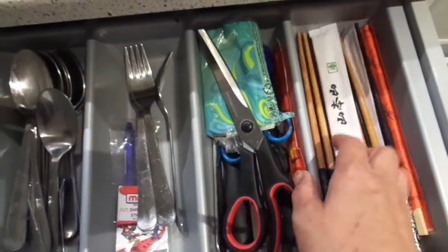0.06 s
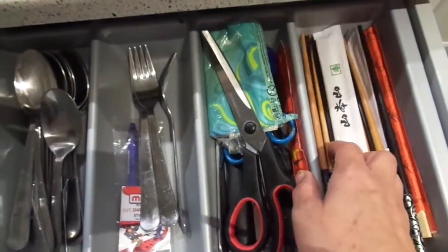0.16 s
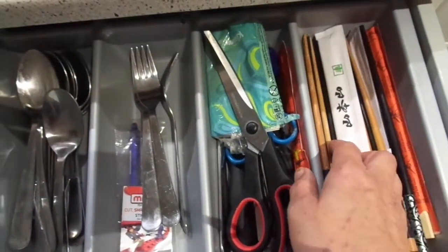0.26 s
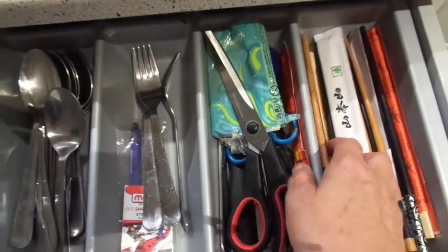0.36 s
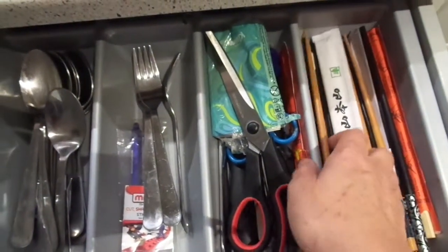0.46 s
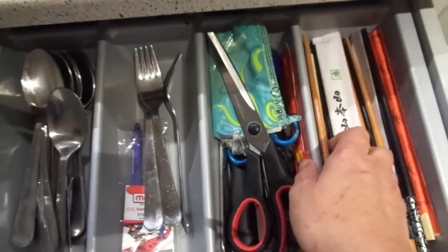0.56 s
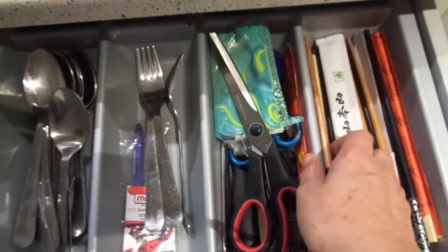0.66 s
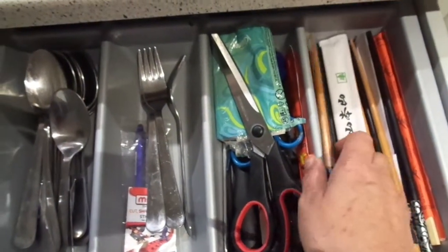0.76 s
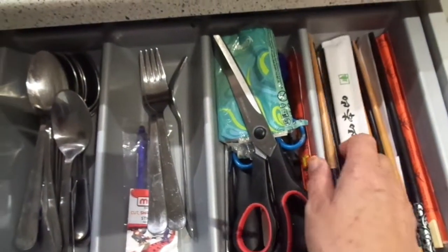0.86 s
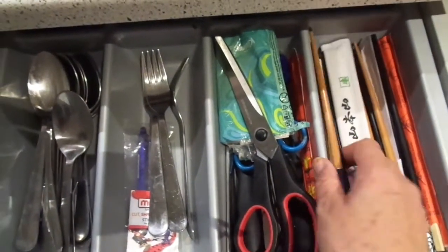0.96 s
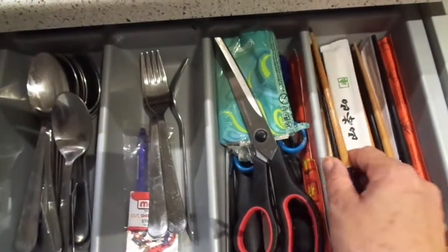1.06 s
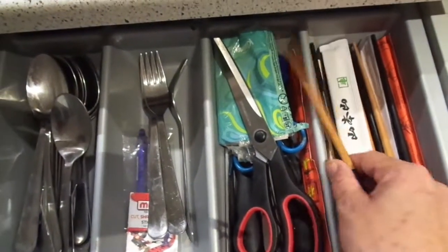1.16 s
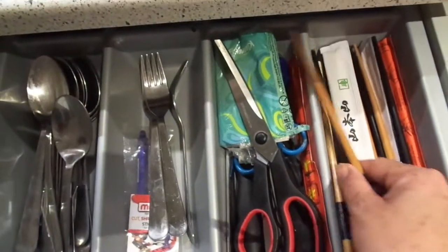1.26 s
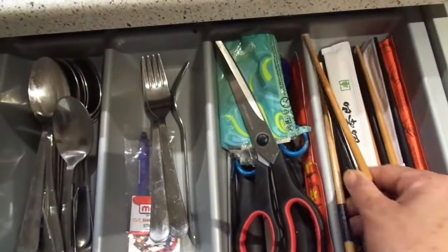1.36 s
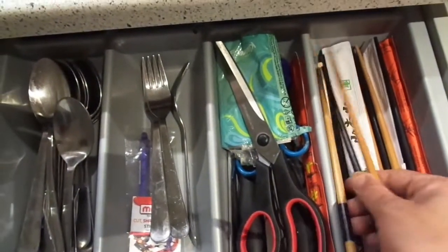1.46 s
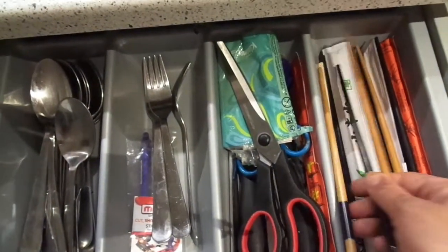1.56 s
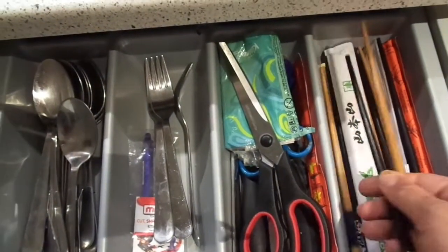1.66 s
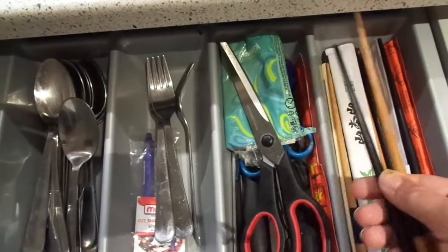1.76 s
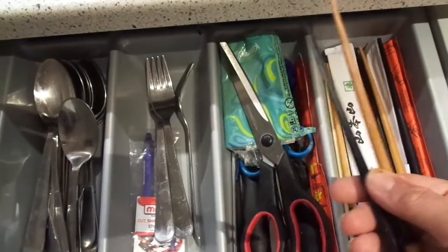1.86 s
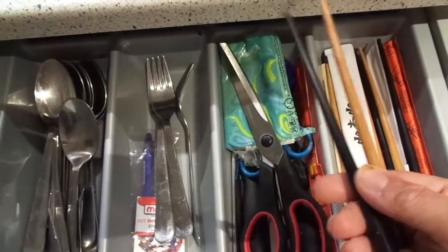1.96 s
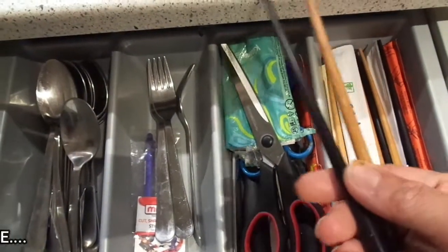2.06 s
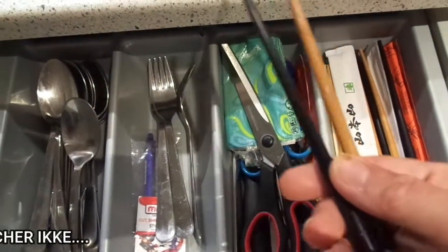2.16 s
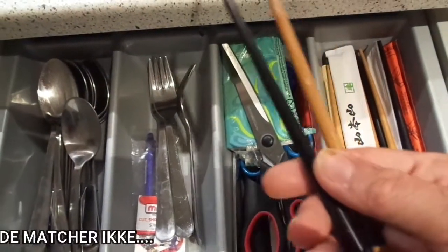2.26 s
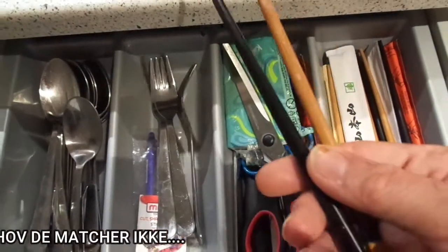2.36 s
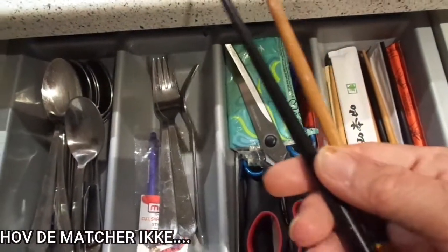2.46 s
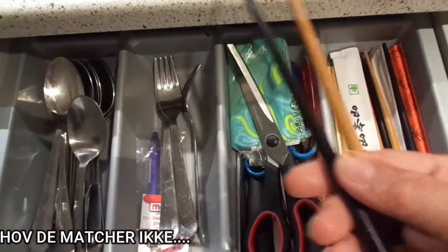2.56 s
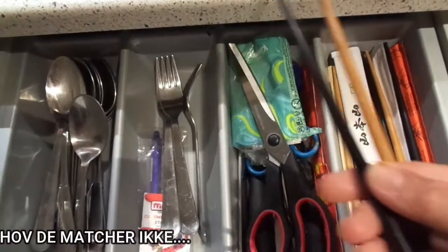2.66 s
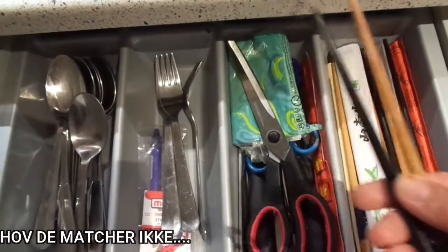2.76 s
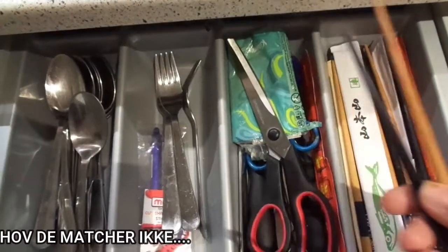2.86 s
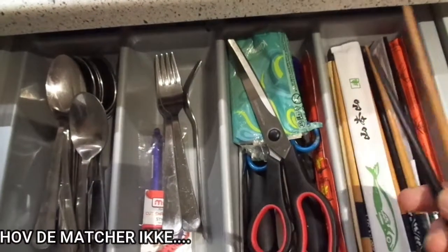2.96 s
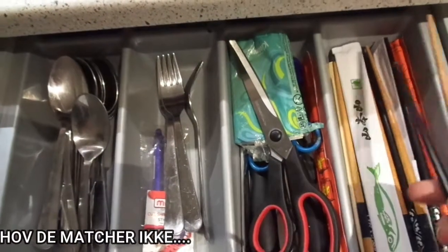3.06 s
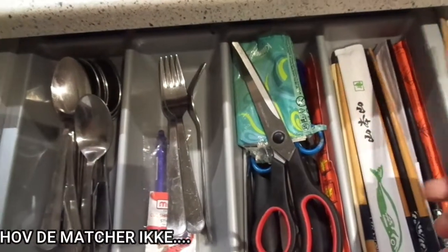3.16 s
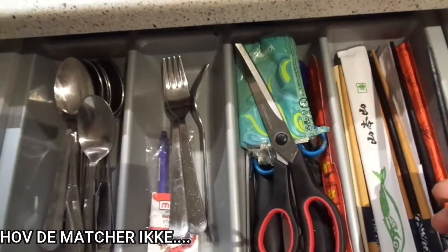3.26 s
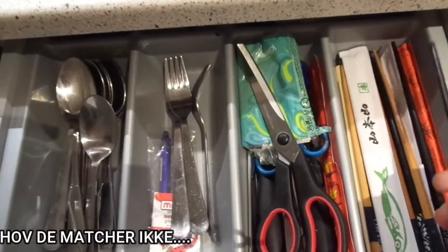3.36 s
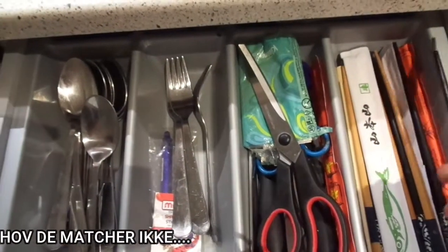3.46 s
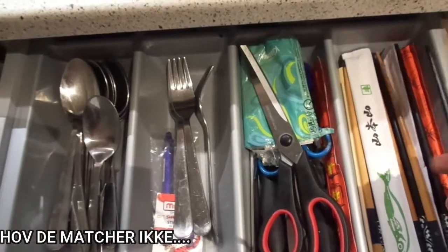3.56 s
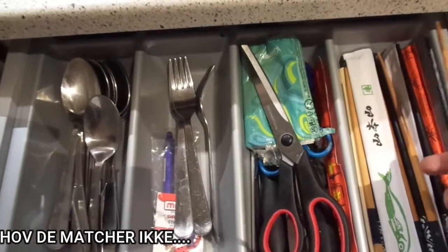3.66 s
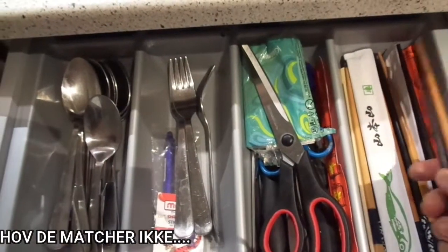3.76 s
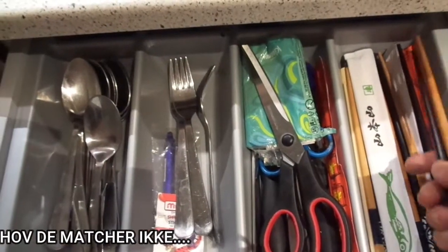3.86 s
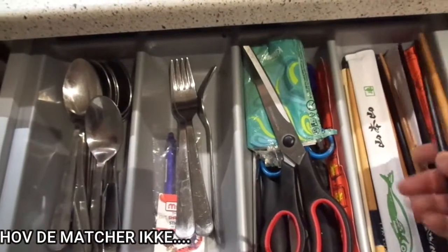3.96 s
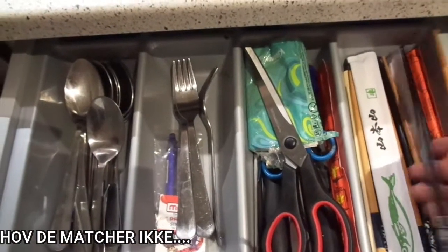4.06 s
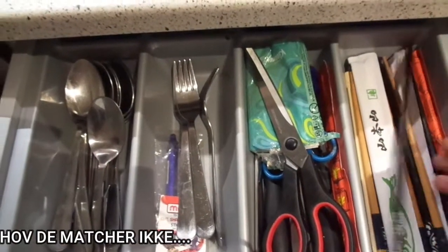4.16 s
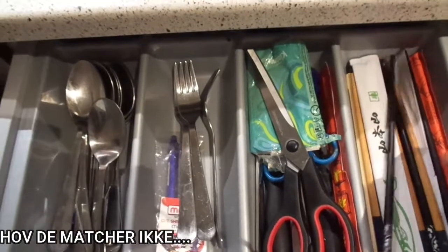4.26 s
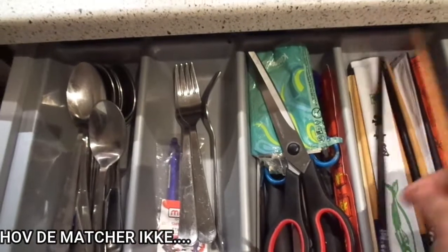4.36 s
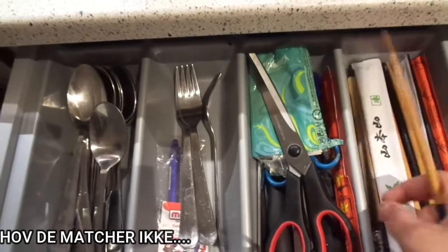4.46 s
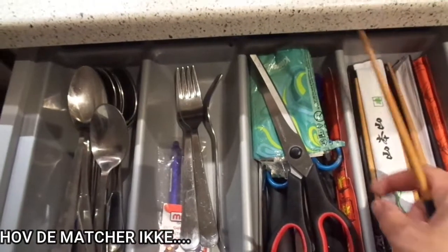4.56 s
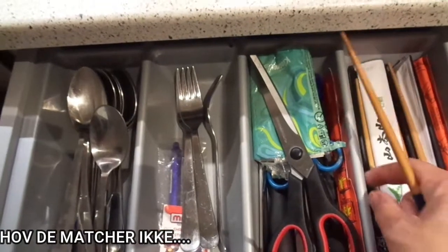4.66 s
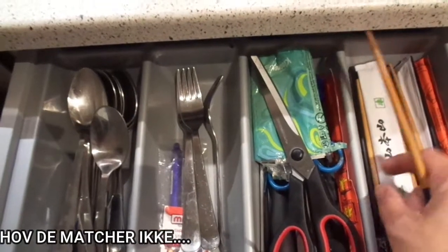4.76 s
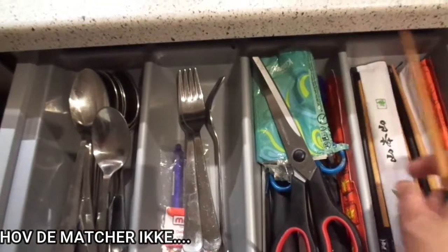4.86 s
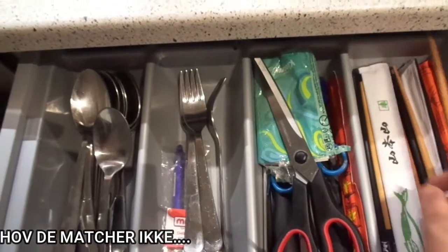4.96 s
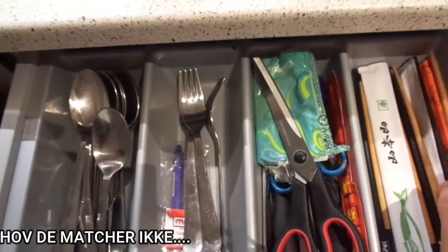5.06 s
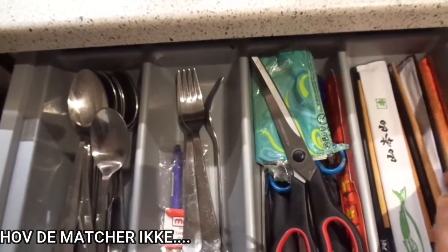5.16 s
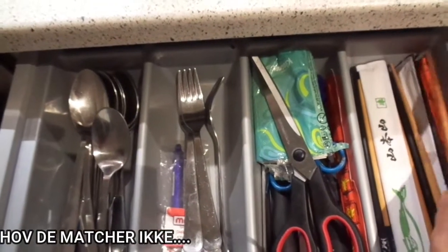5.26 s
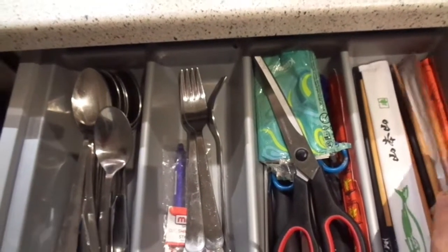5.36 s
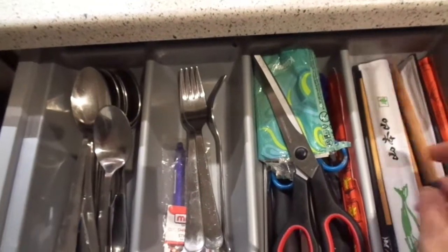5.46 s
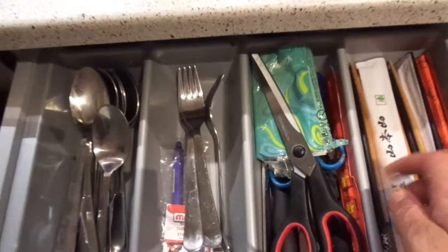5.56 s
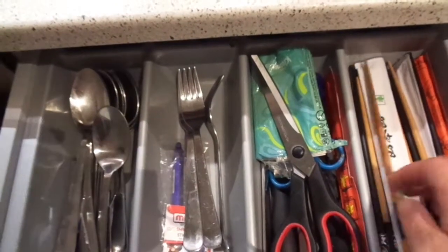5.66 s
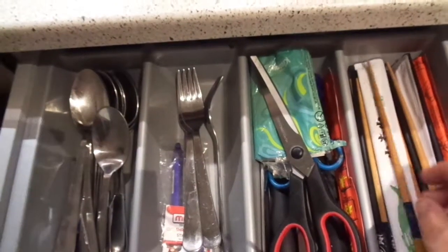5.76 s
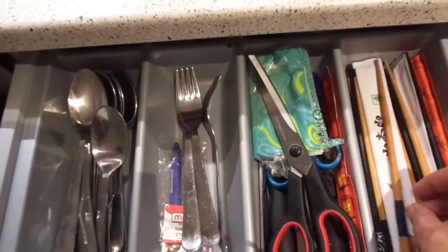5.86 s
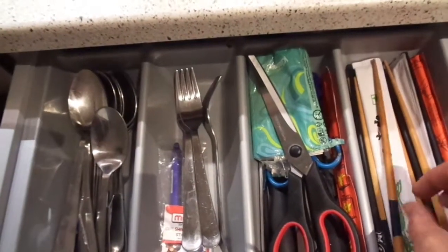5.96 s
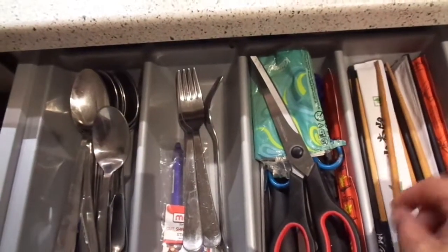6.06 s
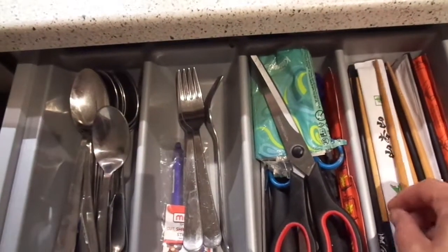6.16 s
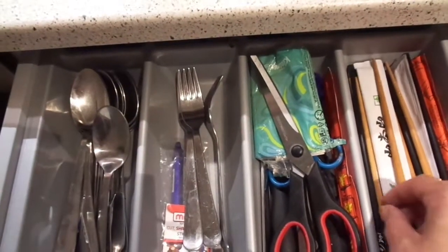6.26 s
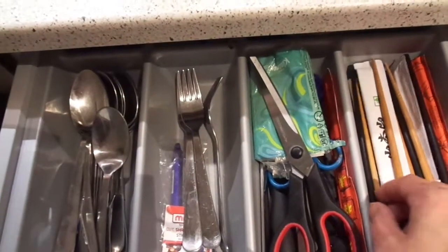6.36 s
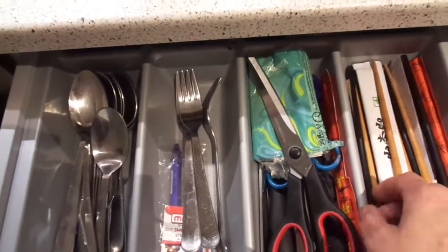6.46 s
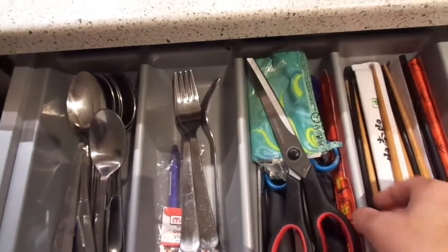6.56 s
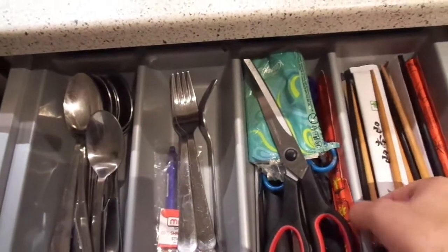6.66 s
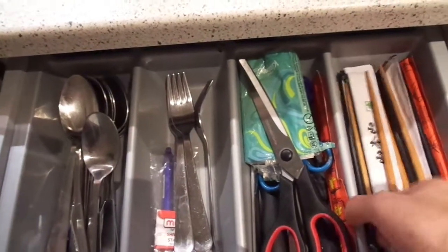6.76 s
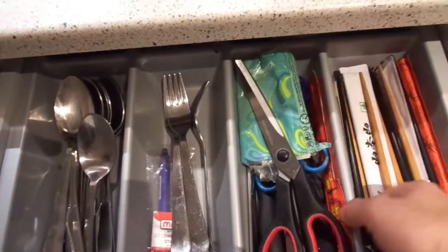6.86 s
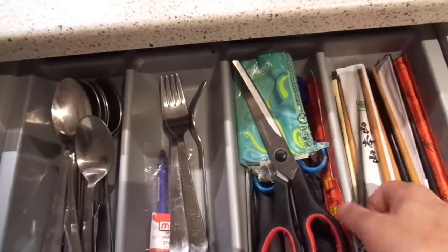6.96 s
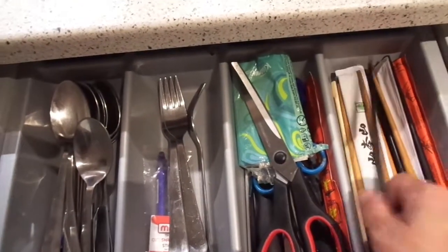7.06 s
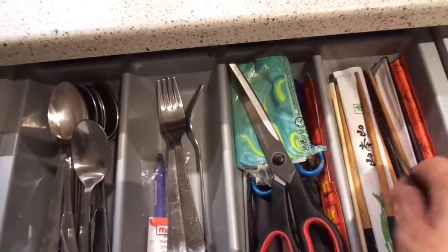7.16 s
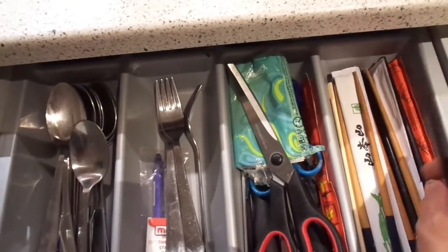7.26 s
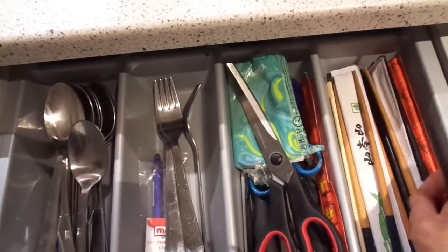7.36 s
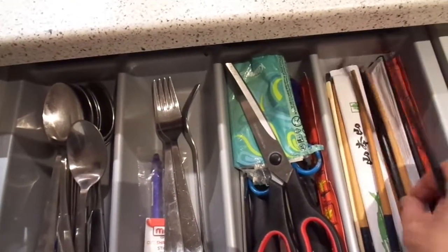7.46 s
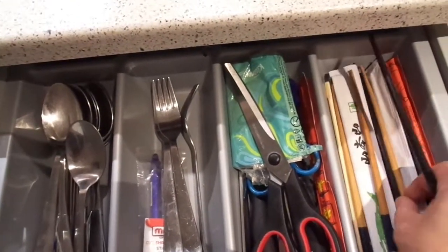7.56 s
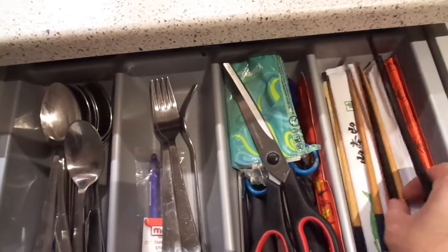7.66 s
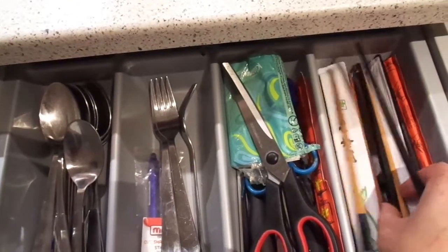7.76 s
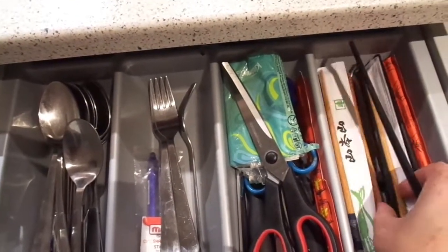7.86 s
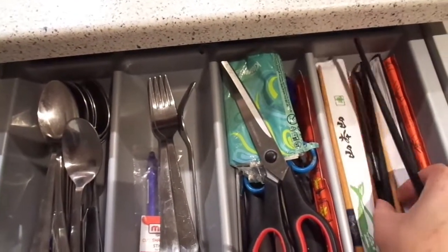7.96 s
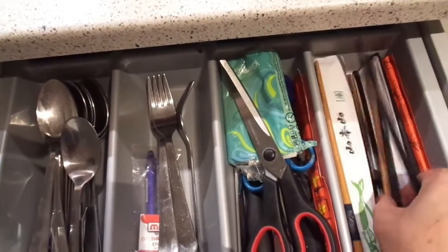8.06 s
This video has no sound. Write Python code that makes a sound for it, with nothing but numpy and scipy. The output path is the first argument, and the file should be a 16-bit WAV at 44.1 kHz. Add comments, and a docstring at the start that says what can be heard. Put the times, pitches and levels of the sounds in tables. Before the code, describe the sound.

Dry, hollow plastic knocks and bright crackling clicks from hard sticks, with scraping slides and soft low drawer bumps. Busy at first, then a sharp single clack with a brief high ring, then mostly faint appliance whir. Another clatter comes midway, then heavy knocks and continuing rummaging. Close and mostly mono, short room reflections, loudest hits distorting slightly.

```python
"""A hand rummages among chopsticks in a plastic drawer tray, close to one microphone; an appliance whirs throughout.
0-1.4 s: dense flurry of knocks (modal tray) and clicks (noise crackles), then weaker ones; 1.7 s: hard knock, a rod
rings (bending modes). Near quiet with stray contacts until a burst at 4.1-4.6 s, again with the rod; hardest knock
at 5.6 s; from 6.1 s rummaging to the end. Sliding (stick-slip grains) and soft drawer bumps (low panel modes) go
with the busy spells; the loudest knocks clip."""
import sys
import numpy as np
from scipy import signal
from scipy.fft import rfft, irfft, next_fast_len
from scipy.io import wavfile
from scipy.ndimage import uniform_filter1d, map_coordinates

SR = 44100
rng = np.random.default_rng(int(sys.argv[2]) if len(sys.argv) > 2 else 0)


def dump(signal):
    """Clip the signal to [-1, 1] and save it as 16-bit WAV at the path in sys.argv[1]."""
    limited = np.clip(np.atleast_2d(signal).T, -1, 1)
    pcm = np.round(limited * 32767).astype(np.int16)
    wavfile.write(sys.argv[1], SR, pcm)


def boost_factor(decibels):
    """Convert a level in decibels to a linear amplitude factor."""
    exponent = np.asarray(decibels, float) / 20
    return 10 ** exponent


N = 357651


def unit(x):
    """Scaled to rms 1."""
    return x / np.sqrt(np.mean(x ** 2) + 1e-20)


def along(points, hz):
    """(Hz, value) points interpolated on a log frequency axis."""
    point_hz, value = np.transpose(points)
    return np.interp(np.log(hz + 1), np.log(point_hz + 1), value)


def filtered(x, response):
    """x times a complex response of frequency."""
    size = next_fast_len(len(x) + 8192)
    hz = np.fft.rfftfreq(size, 1 / SR)
    return irfft(rfft(x, size) * response(hz), size)[:len(x)]


def coloured(x, spectrum):
    """x through a (Hz, dB) spectrum, rms 1."""
    return unit(filtered(x, lambda hz: boost_factor(along(spectrum, hz))))


def resonances(humps):
    """Causal response of (Hz, width Hz, dB) resonances, summed with alternating sign."""
    def response(f):
        return sum((-1) ** k * boost_factor(db) * 1j * f * width / (hz * hz - f * f + 1j * f * width)
                   for k, (hz, width, db) in enumerate(humps))
    return response


def wobble(knots_per_s):
    """Smooth random curve through normal knots."""
    knots = rng.standard_normal(int(N * knots_per_s / SR) + 4)
    return map_coordinates(knots, [np.arange(N) * knots_per_s / SR])


def ring(modes, t, scatter_db, detune, chatter, tilt_db=0, damping=1, best_hz=1):
    """One blow: modes start together at random strengths, loose neighbours jog their phases; peak 1."""
    hz, db, t60_s = np.transpose(modes)[:, :, None]
    strength, shift = rng.standard_normal((2, len(modes), 1))
    jog = rng.standard_normal((len(modes), len(t) // 32 + 1))
    jog = np.repeat(jog, 32, axis=1)[:, :len(t)]
    phase = 2 * np.pi * hz * (1 + detune * shift) * t
    phase = phase + chatter * np.sqrt(hz / 1000) * np.cumsum(jog, axis=1)
    place_db = 6 * np.exp(-(np.log2(hz / best_hz) / 0.16) ** 2)  # the point of contact favours some modes
    level_db = db + scatter_db * strength + tilt_db * np.log2(hz / 1000) + place_db
    level_db = level_db - 60 * t * max(damping, 0.2) / t60_s
    x = np.sum(boost_factor(level_db) * np.sin(phase), axis=0)
    return x / np.abs(x).max()


def add(out, start_s, x):
    """Mix x into out from start_s."""
    out[round(start_s * SR):][:len(x)] += x


def grains(per_s, spread_db):
    """Random impulses of either sign, a few much stronger."""
    chance, size = rng.random((2, N))
    level = boost_factor(-spread_db * np.log(size + 0.034))
    return (chance < per_s / SR) * level * rng.choice([-1, 1], N)


# appliance casing resonances: (frequency [Hz], width [Hz], relative level [dB])
WHIR_HUMPS = [(537, 41, -6), (978, 61, 1), (1250, 84, 0.3), (1862, 210, -3.5), (3620, 220, -10.5),
              (5500, 480, -20.5)]
# air and microphone noise: (frequency [Hz], relative density [dB])
HISS_SPECTRUM = [(20, -12), (60, -10.5), (200, -6), (700, -4), (2200, -5), (4500, -12), (9000, -15),
                 (15200, -17.5)]


def whir():
    """Air noise through casing resonances, each wavering in level, over a steady hiss."""
    waver_db, waver_knots_per_s = 1.8, 6.3
    humps = np.zeros(N)
    for hump in WHIR_HUMPS:
        waver = boost_factor(waver_db * wobble(waver_knots_per_s))
        humps += waver * filtered(rng.standard_normal(N), resonances([hump]))
    hiss = coloured(rng.standard_normal(N), HISS_SPECTRUM)
    return boost_factor(-55.0) * unit(humps) + boost_factor(-57.5) * hiss


# room decay: (frequency [Hz], t60 [s])
ROOM_DECAY = [(250, 0.17), (1000, 0.25), (4000, 0.18), (10000, 0.13)]


def kitchen(x):
    """Room response: noise tail decaying per frequency, redrawn every tenth of a second."""
    out, step = np.zeros(N + 2 * SR), SR // 10
    delay_s = 0.0033
    for start in range(0, N, step):
        hz, t, z = signal.stft(rng.standard_normal(SR // 2), SR, nperseg=256)
        decay = boost_factor(-60 * t / along(ROOM_DECAY, hz)[:, None])
        tail = signal.istft(z * decay, SR, nperseg=256)[1]
        tail = tail / np.linalg.norm(tail)
        add(out, start / SR + delay_s, signal.fftconvolve(x[start:start + step], tail))
    return out[:N]


# low drawer panel modes: (frequency [Hz], relative level [dB], t60 at damping 1 [s])
DRAWER_MODES = [(141, -15.5, 0.079), (257.5, -0.5, 0.33), (388.5, -3.5, 0.051)]
# hand bumps the drawer: (time [s], level [dB])
DRAWER_BUMPS = [(.075, -21), (4.099, -35), (4.226, -23), (4.319, -40), (4.515, -25), (5.58, -17),
                (5.753, -32), (6.549, -40), (7.189, -30), (7.231, -36), (7.266, -44), (7.413, -31),
                (7.582, -26), (7.722, -26), (8.091, -22)]


def bumps():
    """A soft push on the drawer sounds only its low panels."""
    out, t = np.zeros(N + SR), np.arange(SR // 5) / SR
    onset = 1 - np.exp(-t / 0.01)
    for start_s, db in DRAWER_BUMPS:
        panels = ring(DRAWER_MODES, t, scatter_db=3.5, detune=0.02, chatter=0.028, damping=1.5)
        add(out, start_s, boost_factor(db) * panels * onset)
    return out[:N]


# tray and drawer modes: (frequency [Hz], relative level [dB], t60 at damping 1 [s])
TRAY_MODES = [(547, -14.5, 0.05), (547.7, -7.5, 0.21), (678.4, -3, 0.18), (734.6, 1.8, 0.096),
              (810.3, -3.5, 0.14), (883, 1, 0.053), (1050.7, 1, 0.075), (1107.4, -4.5, 0.14),
              (1180, -3, 0.083), (1338, 0.5, 0.055), (1560, -6.5, 0.087), (1643, -7, 0.06),
              (1863, -12.5, 0.21), (2012, -13, 0.13), (2192, -10, 0.1), (2396, -12.5, 0.14),
              (2614, -10.5, 0.069), (2886, -12.5, 0.053), (3260, -22, 0.15)]
# rasp colour: (frequency [Hz], relative density [dB])
RASP_SPECTRUM = [(1060, -39), (1800, -10), (2430, 1), (2980, -10), (3830, -6), (5600, -6.5), (7710, -15),
                 (15000, -51)]
# hand pushes sticks along: (start [s], hold [s], tray rumble level [dB], rasp level [dB])
HAND_STROKES = [(0.0, 0.19, -32, -46), (.345, .03, -38.5, -57.5), (0.455, 0.24, -36, -45),
                (0.798, 0.3, -48.5, -57), (1.545, .2, -51.5, -67), (4.114, 0.21, -34.5, -43.5),
                (4.525, 0.12, -49, -57), (4.816, 0.046, -55, -56.5), (5.6, .16, -41, -48.5),
                (5.792, 0.068, -47, -51), (6.111, 0.081, -50.5, -58), (6.4, .1, -48, -57),
                (6.61, 0.2, -40, -49.5), (6.786, 0.019, -26.5, -39), (6.878, 0.1, -46, -51),
                (7.194, 0.068, -56, -53.5), (7.489, .1, -50, -41.5), (7.7, .04, -31.5, -36),
                (7.799, 0.48, -41.5, -53)]
RISE_DB_PER_S, FALL_DB_PER_S = 596, 200.5


def slide():
    """Stick-slip grains under the moving sticks drive the tray and rasp in the treble."""
    at = np.arange(N) / SR
    rumble, rasp = np.zeros((2, N))
    for start_s, hold_s, rumble_db, rasp_db in HAND_STROKES:
        rise_db = RISE_DB_PER_S * np.clip(start_s - at, 0, 1)
        fall_db = FALL_DB_PER_S * np.clip(at - start_s - hold_s, 0, 1)
        push = boost_factor(-rise_db - fall_db)
        rumble += boost_factor(rumble_db) * push
        rasp += boost_factor(rasp_db) * push
    lumpy_db = 4.5
    slips = grains(600, spread_db=4.0) * boost_factor(lumpy_db * wobble(30))
    modes = TRAY_MODES + DRAWER_MODES[1:]
    walls = resonances([(hz, 4.0 / t60_s, db) for hz, db, t60_s in modes])
    treble = coloured(slips + grains(3300, spread_db=5.0), RASP_SPECTRUM)
    return rumble * unit(filtered(slips, walls)) + rasp * treble


# bending modes of the hard stick: (frequency [Hz], relative level [dB], t60 [s])
ROD_MODES = [(3510, -2.5, 0.078), (5140, 0.5, 0.071), (6980, -4.5, 0.067), (8960, -13, 0.098),
             (11100, -19.5, 0.089)]
# hard rod is struck: (time [s], level [dB])
ROD_STRIKES = [(1.705, -16.5), (1.732, -28), (1.767, -27), (4.096, -25), (4.21, -10), (4.322, -41.5)]


def rod():
    """One hard stick rings in its bending modes while it chatters against its neighbours."""
    out, t = np.zeros(N + SR), np.arange(SR // 5) / SR
    for start_s, db in ROD_STRIKES:
        add(out, start_s, boost_factor(db) * ring(ROD_MODES, t, scatter_db=6.0, detune=0.0052, chatter=0.009))
    return out[:N]


# click colour: (frequency [Hz], relative level [dB])
CLICK_SPECTRUM = [(1060, -4), (1800, -10), (2270, -8), (3250, -5), (4220, -5.5), (5670, -7.5), (6490, -8),
                  (7030, -10), (7830, -12), (13700, -34), (15300, -67.5)]
# sticks click on each other: (time [s], level [dB], pitch [Hz])
STICK_CLICKS = [(0.089, -15.5, 6000), (0.139, -19, 6270), (0.193, -36, 4500), (0.364, -18, 3070),
                (0.376, -8, 4100), (0.389, -3, 3380), (0.43, -18, 6500), (0.451, -12.5, 6070),
                (0.477, -18.5, 6040), (0.626, -25.5, 4160), (0.6364, -20.5, 3800), (0.681, -30.5, 4140),
                (0.694, -25.5, 3680), (0.733, -23, 6700), (0.745, -28.5, 6300), (1.044, -37, 3360),
                (1.081, -45, 4560), (1.1074, -37.5, 3840), (1.168, -35.5, 3200), (1.392, -36, 4040),
                (1.662, -33, 2960), (1.703, -1.5, 6720), (1.735, -17, 5200), (1.7935, -23.5, 4700),
                (2.0072, -35, 4000), (3.2373, -32.5, 5800), (3.3546, -27, 3570), (3.5112, -35.5, 3850),
                (3.9574, -44, 4690), (4.095, -19.5, 6600), (4.15, -12, 4840), (4.196, -21, 3120),
                (4.213, -8, 5100), (4.3086, -34, 5630), (4.318, -26.5, 5000), (4.513, -24, 3040),
                (4.577, -35, 3710), (4.615, -35, 6100), (5.0429, -39.5, 4350), (5.1672, -25.5, 3200),
                (5.403, -33.5, 2900), (5.578, -17, 6580), (5.621, -5, 4300), (5.6746, -10, 3980),
                (5.801, -35, 6300), (5.818, -28.5, 6500), (5.9546, -35, 4050), (6.121, -44, 4760),
                (6.157, -33.5, 6340), (6.2956, -33, 6620), (6.3248, -15, 2975), (6.561, -26, 6070),
                (6.5855, -15, 3830), (6.739, -28, 5900), (6.794, -3, 6100), (6.9241, -27, 5100),
                (6.968, -33, 3160), (7.011, -16.5, 6830), (7.1863, -28, 4240), (7.223, -24, 6730),
                (7.419, -36.5, 3060), (7.487, -45, 4640), (7.5054, -25, 4980), (7.5205, -18, 4100),
                (7.564, -18.5, 3920), (7.6764, -24, 4200), (7.704, -29, 3200), (7.724, -22.5, 3230),
                (7.762, -15.5, 3700), (7.82, -17, 3070), (7.8416, -11, 5110), (7.8525, -29, 4460),
                (7.891, -26.5, 3010), (7.984, -30, 4270), (8.05, -31, 5960), (8.07, -23.5, 4750),
                (8.088, -9, 4500)]
CRACK_T60_S, SPIKE, SPIKE_S = 0.049, 1.4, 0.0015  # noise decay; extra strength of the first instant, its time constant
PING_DB, PING_LOSS, PING_T60_S = -18.5, 0.24, 0.04  # ring in a 0 dB click; dB lost per dB of a harder click


def clicks():
    """Hard sticks meet in a short bright crackle at their own pitch; jolted neighbours rattle on, broad and weak."""
    out, jolt, t = np.zeros(N + SR), np.zeros(N + SR), np.arange(SR // 5) / SR
    sharp, pitch_db, side_db = 0.13, 9, 3  # resonance width per Hz; gains at the pitch and at two random pitches
    for start_s, db, hz in STICK_CLICKS:
        noise, grit = rng.standard_normal((2, len(t)))
        spike = 1 + SPIKE * np.exp(-t / SPIKE_S)
        crack = noise * boost_factor(1.9 * grit - 60 * t / CRACK_T60_S) * (1 - np.exp(-t / 0.0002)) * spike
        others = [(c, sharp * c, side_db) for c in rng.uniform(2500, 10600, size=2)]
        pair = resonances([(hz, sharp * hz, pitch_db)] + others)
        crack = filtered(crack, lambda f: boost_factor(along(CLICK_SPECTRUM, f)) * (1 + pair(f)))
        ping = ring([(hz, 0, PING_T60_S)], t, scatter_db=0, detune=0, chatter=0.0092, best_hz=hz)
        ping = boost_factor(PING_DB - PING_LOSS * db) * ping
        add(out, start_s, boost_factor(db) * (crack / np.abs(crack).max() + ping))
        add(jolt, start_s, boost_factor(db - 19.5 - 60 * t / 0.21) * (1 - np.exp(-t / 0.0037)))
    rattle = coloured(grains(1200, spread_db=5.5) * boost_factor(4 * wobble(70)), CLICK_SPECTRUM)
    return out[:N] + jolt[:N] * rattle


def burst(t60_s, per_s, first):
    """A first contact and a flurry of weaker, dying ones; energy 1."""
    t = np.arange(SR // 8) / SR
    chance, size = rng.random((2, len(t)))
    x = (chance < per_s / SR) * (2 * size - 1) * boost_factor(-60 * t / t60_s)
    x[0] = first
    return x / np.linalg.norm(x)


# sticks strike the tray: (time [s], level [dB], hardness [dB/octave], best-driven frequency [Hz])
TRAY_KNOCKS = [(0.073, -14, 2, 689), (0.087, -4, 9, 1180), (0.124, -9, -5, 755), (0.138, -7, 2, 750),
               (0.197, -16.5, -5, 770), (0.362, -4.5, -0.5, 1030), (0.375, 7.5, 3, 1070),
               (0.39, 9.5, -0.5, 657), (0.427, -10, 14, 781), (0.455, -5, 1, 1080),
               (0.482, -2.5, -0.5, 1120), (0.533, -9.5, 1, 690), (0.586, -10.5, 4.5, 1390),
               (0.605, -12.5, 3, 730), (0.628, -7.5, 2, 1070), (0.669, -14, -4, 1110),
               (0.692, -12, 1.5, 689), (0.716, -10, 1.5, 1040), (0.733, -14, 0, 729),
               (0.755, -21, -2.5, 710), (0.833, -23, -2.5, 1180), (0.916, -25, -4, 880),
               (0.956, -23.5, 0.5, 786), (0.994, -27.5, -6.5, 700), (1.041, -24, -0.5, 660),
               (1.09, -21, -1, 1530), (1.165, -8, 1.5, 680), (1.243, -19, -2, 680),
               (1.273, -20.5, -2.5, 670), (1.39, -26.5, -1.5, 737), (1.596, -24, -2, 740),
               (1.651, -13, 1.8, 1350), (1.664, -18, -1.5, 745), (1.703, 8.5, 4, 1330),
               (1.795, -18.5, -1.5, 743), (3.355, -17.5, 6.5, 1340), (3.511, -41, 12.5, 1870),
               (4.097, -13, 9.5, 860), (4.156, -2, 7.5, 1120), (4.22, 8, 1.7, 650),
               (4.261, -10, 10.5, 1120), (4.332, -16.5, -1.5, 676), (4.416, -23.5, 0.5, 711),
               (4.495, -19.5, -4, 650), (4.513, -0.5, -2.5, 1060), (5.04, -27, 2.5, 1260),
               (5.169, -29, 7, 1050), (5.389, -30, 5.5, 1040), (5.577, -0.5, -2, 720),
               (5.621, 12, 2.8, 694), (5.676, 4.5, 0.5, 1030), (5.954, -29, 1, 830),
               (6.129, -29, -0.5, 705), (6.149, -20.5, 2, 1250), (6.297, -22, 6, 2370),
               (6.329, 1.5, -2.2, 710), (6.39, -16, 0.5, 1090), (6.441, -25.5, 2.5, 1290),
               (6.568, -17.5, 0.5, 1090), (6.588, 1.5, 4, 662), (6.665, -20, 5, 757), (6.74, -17, 6.5, 697),
               (6.785, -1, 14, 1300), (6.791, 10.5, 2.9, 700), (6.863, -27, -4, 740), (6.908, -0.5, 4, 685),
               (7.011, -13, 10.5, 2350), (7.185, -18, 8, 1650), (7.227, -21, 2, 1660),
               (7.41, -33.5, -1, 1380), (7.483, -21.5, -5, 786), (7.518, -7.5, 11, 2380),
               (7.567, -10, 9.5, 2480), (7.678, -6, 3.5, 1400), (7.706, -8.5, 6.5, 1670),
               (7.758, -3, -0.5, 630), (7.821, -0.5, 7, 1120), (7.844, 2.5, 6, 746),
               (7.857, -1.5, 4.5, 1690), (7.891, -4.5, 1.3, 680), (7.985, -12, -0.7, 1060),
               (8.093, -7.5, 4.5, 1000)]
DAMPING, DAMPING_PER_DB = 1.4, 0.0262  # after a hard blow the sticks lie on the tray
DAMPING_PER_HARDNESS = 0.035  # hard, bright contacts near the walls die sooner
THUD_DB, THUD_LOSS = -35.5, 0.6  # drawer thud under a 0 dB knock; dB lost per dB of a harder knock


def knocks():
    """A stick lands with a sharp blow and after-contacts, ringing the tray and thudding the drawer panels."""
    out, t = np.zeros(N + SR), np.arange(SR // 6) / SR
    slap = (1 - np.exp(-t / 0.0015)) * (1 + 0.82 * np.exp(-t / 0.0045))  # the stick drives the first cycles
    for start_s, db, hard_db, hz in TRAY_KNOCKS:
        damping = DAMPING + DAMPING_PER_DB * db + DAMPING_PER_HARDNESS * hard_db
        tray = ring(TRAY_MODES, t, scatter_db=2.5, detune=0.011, chatter=0.011,
                    tilt_db=hard_db, damping=damping, best_hz=hz)
        thud = ring(DRAWER_MODES, t, scatter_db=0.5, detune=0.026, chatter=0.028)
        thud = boost_factor(THUD_DB - THUD_LOSS * db) * thud * (1 - np.exp(-t / 0.003))
        contacts = burst(t60_s=0.06, per_s=210, first=3)
        add(out, start_s, boost_factor(db) * signal.fftconvolve(tray * slap + thud, contacts))
    return out[:N]


def scene():
    """The small tray radiates little bass; one microphone feeds both channels."""
    sources = bumps() + slide() + rod() + clicks() + knocks()
    tray = filtered(sources, lambda hz: (1j * hz / (1j * hz + 170)) ** 4)
    mono = whir() + boost_factor(-9.5) * kitchen(tray) + tray
    return np.array([mono, mono])


# colour of the gated noise: (frequency [Hz], relative density [dB])
GATED_NOISE_SPECTRUM = [(18, -39.5), (30, -10.5), (123, -12.5), (290, 3.5), (516, -5), (5130, -3),
                        (9100, -4), (15300, -43.5)]


def gated_noise(mono):
    """Coloured noise gated by a random curve, its level following the 0.67th power of the running rms."""
    loudness = np.sqrt(np.abs(uniform_filter1d(mono ** 2, size=2048)))
    gate = wobble(14) > 0.3
    return boost_factor(-41.5) * loudness ** 0.67 * gate * coloured(rng.standard_normal(N), GATED_NOISE_SPECTRUM)


def top_cut(x):
    """Nothing passes above the cut-off."""
    return signal.sosfilt(signal.butter(12, 15490, fs=SR, output="sos"), x)


def record(dry):
    """The input clips at full scale, with a slight DC offset; gated noise is added to left, subtracted from right."""
    clipped = np.clip(dry[0], -1, 1) - 0.0006
    mix = clipped + gated_noise(clipped) * [[1], [-1]]
    return top_cut(mix)


dry = scene()
out = record(dry)
dump(out)
```